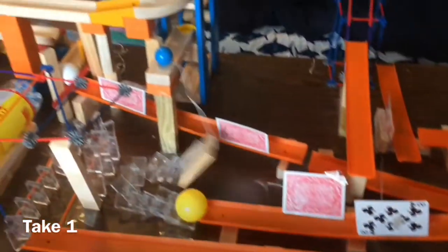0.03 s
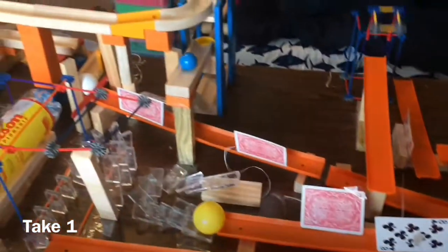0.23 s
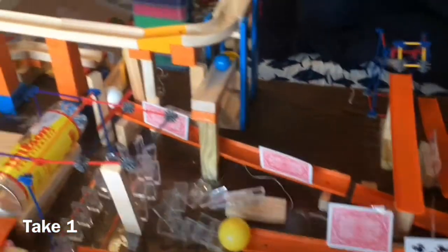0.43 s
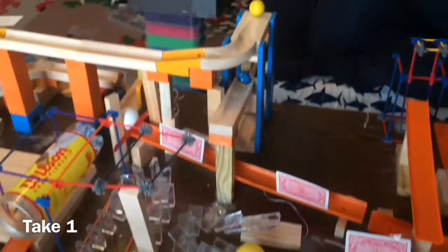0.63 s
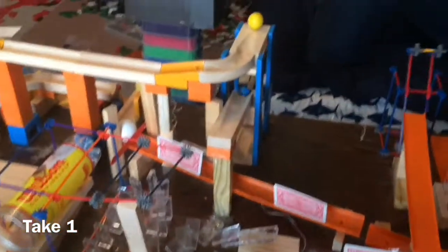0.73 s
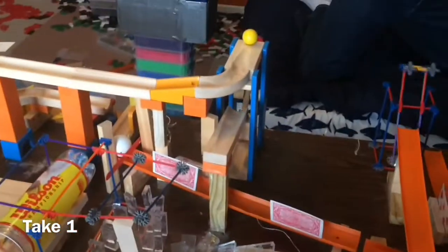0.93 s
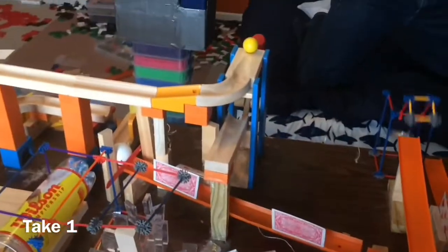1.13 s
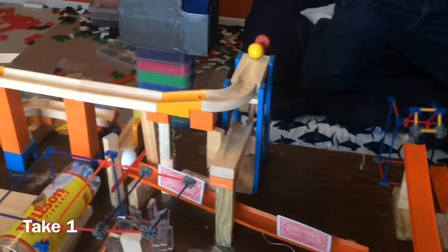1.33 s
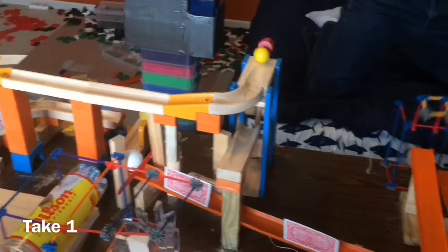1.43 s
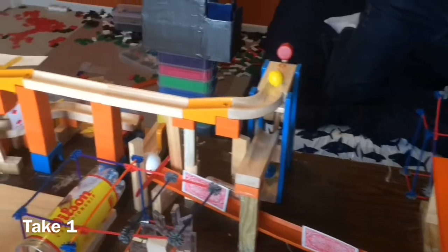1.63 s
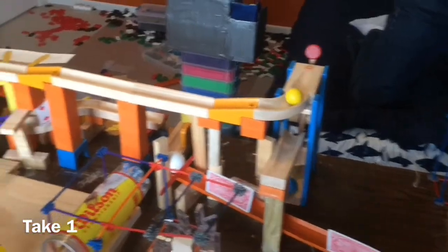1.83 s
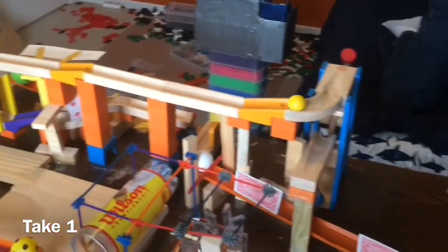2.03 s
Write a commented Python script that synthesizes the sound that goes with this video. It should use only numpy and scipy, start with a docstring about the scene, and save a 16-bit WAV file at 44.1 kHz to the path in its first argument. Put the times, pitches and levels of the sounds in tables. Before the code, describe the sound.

Balls roll and clack through a homemade chain-reaction machine, with one loud wooden slam.

```python
"""A homemade chain-reaction machine on a wooden floor, heard from a metre away in a small room.
A faint metallic ring fades as a ball rumbles along plastic track. At 0.2 s a catch snaps and a wooden
block slams onto plastic. Loose pieces clatter and tinkle, then the ball bumps on the track. At 1.5 s
one ball knocks another, which drops down a wooden ramp and rolls on. Each hit makes a part ring at
its own natural tones (modes); rolling is a stream of tiny bumps that do the same."""
import sys
import numpy as np
from scipy import signal
from scipy.fft import rfft, irfft, next_fast_len
from scipy.io import wavfile
from scipy.ndimage import uniform_filter1d

SR = 44100
rng = np.random.default_rng(int(sys.argv[2]) if len(sys.argv) > 2 else 0)


def to_wav(sig):
    """Store sig (one row per channel, or 1-D mono) as 16-bit WAV at the path in sys.argv[1].

    Samples outside -1..1 are clipped; the rate is SR.
    """
    pcm = np.clip(np.atleast_2d(sig), -1, 1) * 32767
    pcm = np.round(pcm).astype(np.int16)
    wavfile.write(sys.argv[1], SR, pcm.T)  # frames by channels


N = 92610
TIME = np.arange(N) / SR
RING_TIME = np.arange(16384) / SR  # seconds since a hit


def amp(db):
    """Turn decibels into a gain to multiply by."""
    return 10 ** (np.asarray(db) / 20)


def unit(x):
    """Scale a sound so that its energy is 1."""
    return x / np.sqrt(np.sum(x ** 2))


def at_hz(points, hz):
    """Read between the rows of a table, on a scale of octaves."""
    freqs, values = np.array(points, float).T
    return np.interp(np.log(np.maximum(hz, 1)), np.log(freqs), values)


def fade(t60, t=RING_TIME):
    """A dying-away curve that falls 60 dB in t60 seconds."""
    return np.exp(-np.log(1000) * t / t60)


def colour(x, db_of_hz):
    """Turn each frequency up or down by the given dB."""
    n = 2 * next_fast_len(len(x))
    cepstrum = irfft(np.log(amp(db_of_hz(np.arange(n // 2 + 1) * SR / n))))
    cepstrum[1:n // 2] *= 2  # fold onto one side, so nothing sounds ahead of a hit
    cepstrum[n // 2 + 1:] = 0
    return irfft(rfft(x, n) * np.exp(rfft(cepstrum)))[:len(x)]


def tint(x, spectrum):
    """Shape a sound by a table of f/Hz, level/dB, then set its energy to 1."""
    return unit(colour(x, lambda hz: at_hz(spectrum, hz)))


def scatter(t60):
    """A fading burst of tones so crowded that they sound like noise."""
    t = RING_TIME[:int(np.clip(2 * t60 * SR, 256, len(RING_TIME)))]
    burst = rng.standard_normal(len(RING_TIME))[:len(t)] * fade(t60, t)
    for _ in range(2):  # make all frequencies equally strong, then restore the fade
        phase = np.angle(rfft(burst, 2 * next_fast_len(len(t))))
        flat = irfft(np.exp(1j * phase))[:len(t)]
        power = np.abs(uniform_filter1d(flat ** 2, len(t) // 16))
        burst = flat / np.sqrt(power + 1e-18) * fade(t60, t)
    return np.pad(unit(burst), (0, len(RING_TIME) - len(t)))


def ring(modes, t60):
    """A part's strong tones fade away, each slightly detuned by where the part is pressed."""
    tones = 0
    for k, (hz, db) in enumerate(modes):
        pitch = hz * (1 + 0.0079 * rng.standard_normal())
        tones += (-1) ** k * amp(db) * unit(fade(t60) * np.sin(2 * np.pi * pitch * RING_TIME))
    return tones


def crack(spectrum, burst_t60, burst_db):
    """The noisy side of a hit: a short crack plus a burst of crowded tones."""
    return tint(scatter(t60=0.013) + amp(burst_db) * scatter(burst_t60), spectrum)


def struck(hits, modes, spectrum, burst_t60, burst_db, ring_t60, room_db):
    """A part hit several times in the room; harder contact gives more treble."""
    treble_hz = 4870
    sound = np.zeros(N + len(RING_TIME))
    for seconds, db, treble_db in hits:
        blow = unit(crack(spectrum, burst_t60, burst_db) + ring(modes, ring_t60))
        blow = colour(blow, lambda hz: treble_db * hz ** 2 / (hz ** 2 + treble_hz ** 2))
        start = int(seconds * SR)
        sound[start:start + len(blow)] += amp(db) * np.sqrt(SR / 100) * blow  # energy of 10 ms at db
    return in_room(sound[:N], room_db)


def rolling(levels, response, room_db):
    """A rolling ball: many tiny uneven bumps ring the surface under it."""
    bumps_per_s, spread_db = 1200, 3
    bumps = (rng.random(N) < bumps_per_s / SR) * rng.choice([-1, 1], N)
    bumps = bumps * amp(spread_db * rng.standard_normal(N))
    seconds, db = np.array(levels, float).T
    loudness = amp(np.interp(TIME, seconds, db, left=-140, right=-140))
    shaking = unit(bumps) * np.sqrt(N) * loudness
    return in_room(signal.fftconvolve(shaking, unit(response))[:N], room_db)


def block_slam():
    """A wooden block slams onto plastic and bounces."""
    hits = [(.2105, -6, -4.5), (.2235, -15, -4.5), (.2285, -11.5, -7.5), (.238, -11.5, -25),
            (.2432, -16, -5.5), (.2735, -25, 4.5), (.292, -24.5, -7.5), (.5635, -43.5, -25)]  # contacts: t/s, level/dB, treble/dB
    modes = [(135, -22), (172, -21), (1238, -19), (1597, -13), (1711, -14.5), (1874, -14)]  # strong tones: f/Hz, level/dB
    spectrum = [(40, -26.5), (90, -13.5), (140, -5), (600, -11.5), (1100, -2), (2000, -0.5), (3100, -5),
                (4500, -10), (5800, -19), (6400, -26.5), (15000, -33.5)]  # tone of the crack: f/Hz, level/dB
    return struck(hits, modes, spectrum, burst_t60=0.04, burst_db=2.5, ring_t60=0.08, room_db=-4.5)


def ball_on_ramp():
    """A ball drops down a wooden ramp and rolls on; steady bumping keeps the wood ringing."""
    hits = [(1.681, -23.5, -12), (1.6935, -23.5, 1), (1.7055, -22, -4), (1.7595, -27, -12),
            (1.8038, -24, 13), (1.818, -31, 14.5), (1.846, -42, 27), (1.8585, -41.5, 8), (1.876, -31, -29),
            (1.8995, -36.5, 2.5), (1.9605, -30.5, -4.5)]  # bounces: t/s, level/dB, treble/dB
    modes = [(841, -11), (908, -13), (1400, -13), (1513, -5), (1590, -11)]  # strong tones: f/Hz, level/dB
    spectrum = [(50, -17), (200, -2.5), (1600, 0.5), (2800, -7.5), (4000, -9), (5100, -27), (6700, -27),
                (11000, -49)]  # tone of the crack: f/Hz, level/dB
    roll_levels = [(1.69, -34.5), (1.79, -40.5), (1.86, -30.5), (1.95, -33.5), (2.03, -57.5), (2.1, -74)]  # loudness of the roll: t/s, level/dB
    roll_spectrum = [(100, -11.5), (400, 6.5), (900, -2), (1520, 2.5), (1900, 3), (4000, -9.5),
                     (6000, -24.5), (14000, -41.5)]  # tone of the roll: f/Hz, level/dB
    wood = dict(burst_t60=0.03, burst_db=5)
    bounces = struck(hits, modes, spectrum, **wood, ring_t60=0.07, room_db=-3)
    one_bump = crack(roll_spectrum, **wood) + amp(5) * ring(modes, t60=0.09)
    return bounces + rolling(roll_levels, one_bump, room_db=-8.5)


def ball_knock():
    """One ball knocks another with a short, bright click."""
    hits = [(1.4857, -28.5, -2), (1.4915, -23, -13), (1.519, -40, 0.5), (1.547, -45, 3.5)]  # contacts: t/s, level/dB, treble/dB
    modes = [(2130, -3), (2213, -2), (2363, -2), (3596, -7), (9500, -24)]  # strong tones: f/Hz, level/dB
    spectrum = [(100, -18.5), (500, -14), (1300, -16), (2200, -2.5), (2800, -18.5), (3800, -2),
                (5500, -19.5), (15000, -50)]  # tone of the crack: f/Hz, level/dB
    return struck(hits, modes, spectrum, burst_t60=0.03, burst_db=4, ring_t60=0.03, room_db=-5.5)


def thuds():
    """Low, dull hits follow the knock."""
    hits = [(1.4935, -31.5, -16), (1.5165, -25, -11), (1.529, -29, 0), (1.685, -30, 4)]  # contacts: t/s, level/dB, treble/dB
    modes = [(132, -11), (208, -6), (381, -1), (610, -9), (905, -7.5), (1068, -8)]  # tones that die at once: f/Hz, level/dB
    spectrum = [(50, -18.5), (180, -0.5), (480, 1.5), (900, -7), (1400, -14), (2300, -5), (7000, -29),
                (12000, -43)]  # tone of the thud: f/Hz, level/dB
    return struck(hits, modes, spectrum, burst_t60=0.16, burst_db=1, ring_t60=0.001, room_db=-2.5)


def clatter():
    """Loose pieces are hit and ring briefly."""
    hits = [(.6495, -29.5, 2.5), (.676, -30, -14), (.691, -24.5, -5)]  # contacts: t/s, level/dB, treble/dB
    modes = [(176, -9), (378, -12), (890, -13), (1350, -10), (2222, -7), (3675, -4.5)]  # strong tones: f/Hz, level/dB
    spectrum = [(60, -10), (180, -2), (2200, -1), (3000, -8.5), (3900, -1.5), (5500, -20), (15000, -40)]  # tone of the crack: f/Hz, level/dB
    return struck(hits, modes, spectrum, burst_t60=0.05, burst_db=4, ring_t60=0.12, room_db=-1)


def catch_snap():
    """A catch snaps: two quick contacts with almost no ringing."""
    hits = [(.1797, -40, 3.5), (.1815, -25.5, -0.5)]  # contacts: t/s, level/dB, treble/dB
    modes = [(2400, -12), (7200, -16.5)]  # tones that die at once: f/Hz, level/dB
    spectrum = [(900, -27), (1500, -15.5), (2300, 5.5), (4500, -5), (7200, -1.5), (11000, -9),
                (14500, -2.5)]  # tone of the crack: f/Hz, level/dB
    return struck(hits, modes, spectrum, burst_t60=0.001, burst_db=-11, ring_t60=0.001, room_db=-1)


def ball_on_track():
    """A ball bumps and rumbles along plastic track, which hums under it."""
    hits = [(.7535, -30.5, 11), (.767, -43, -22), (.780, -40, -18), (.797, -33, 9.5), (.810, -43.5, -4)]  # knocks: t/s, level/dB, treble/dB
    modes = [(130, -6), (170, -6.5), (254, -7.5), (358, -4), (900, -8.5), (1765, -9), (4900, -34)]  # strong tones: f/Hz, level/dB
    spectrum = [(60, -3), (170, -4.5), (1850, 2.5), (2900, -14), (4200, -8.5), (6000, -36.5), (15000, -55)]  # tone of the crack: f/Hz, level/dB
    roll_levels = [(0, -57.5), (.05, -61), (.1, -92), (.17, -53.5), (.45, -63.5), (.63, -62.5), (.88, -57),
                   (1.03, -83)]  # loudness of the roll: t/s, level/dB
    roll_spectrum = [(70, -22.5), (450, -0.5), (800, -3), (1700, -3.5), (4500, -14), (12000, -38.5)]  # tone of the roll: f/Hz, level/dB
    hum_levels = [(.45, -60), (.57, -47), (.65, -75), (1.2, -88), (1.25, -69), (1.48, -70)]  # loudness of the hum: t/s, level/dB
    hum_modes = [(421, -2.5), (466, -6), (530, -6)]  # tones of the hum: f/Hz, level/dB
    plastic = dict(burst_t60=0.11, burst_db=2)
    knocks = struck(hits, modes, spectrum, **plastic, ring_t60=0.18, room_db=2.3)
    roll = rolling(roll_levels, crack(roll_spectrum, **plastic), room_db=-0.5)
    hum = rolling(hum_levels, ring(hum_modes, t60=0.046), room_db=-2.5)
    return knocks + roll + hum


def tinkle():
    """Light taps make loose pieces ring very high."""
    hits = [(.6635, -45, 0), (.673, -48, 0), (.691, -50, 0), (.8685, -67, 0)]  # taps: t/s, level/dB, treble/dB
    modes = [(8522, -5), (9500, -9)]  # strong tones: f/Hz, level/dB
    spectrum = [(3500, -24), (8700, 5), (10500, 3), (12300, -16), (14500, 3.5)]  # tone of the crack: f/Hz, level/dB
    return struck(hits, modes, spectrum, burst_t60=0.06, burst_db=9, ring_t60=0.07, room_db=-3)


def metal_ring():
    """A thin ring of closely packed tones dies away at the start."""
    centre_hz, width_hz = 5770, 170
    noise = rng.standard_normal(N)
    band = colour(noise, lambda hz: -20 * np.log10(1 + (2 * (hz - centre_hz) / width_hz) ** 2))
    return amp(-49.5) * np.sqrt(N) * unit(band) * fade(t60=0.23, t=TIME)


def in_room(direct, room_db):
    """Add the room's blur of echoes, which builds up quickly and then fades."""
    fade_times = [(120, 0.34), (400, 0.36), (2000, 0.3451), (6000, 0.184), (14000, 0.4)]  # time for echoes to fall 60 dB: f/Hz, t/s
    spectrum = [(3000, 1), (15000, -5.5)]  # tone of the echoes: f/Hz, level/dB
    delay_s, build_s = 0.00039, 0.00097
    noise = rfft(rng.standard_normal(len(RING_TIME)))
    centres_hz = np.geomspace(60, 16000, 9)
    band_position = at_hz(list(zip(centres_hz, range(9))), np.linspace(1, SR / 2, len(noise)))
    echoes = 0
    for k, hz in enumerate(centres_hz):  # each band fades at its own speed
        band = irfft(noise * np.maximum(1 - abs(band_position - k), 0))
        echoes += band * fade(at_hz(fade_times, hz))
    build_up = 1 - np.exp(-np.maximum(RING_TIME - delay_s, 0) / build_s)
    echoes = colour(unit(echoes * build_up), lambda hz: at_hz(spectrum, hz))
    return direct + amp(room_db) * signal.fftconvolve(direct, echoes)[:N]


def background():
    """The room's steady low rumble and faint hiss."""
    rumble_spectrum = [(20, -21.5), (50, -1.5), (90, -5.5), (135, 0.5), (220, -12.5), (500, -21),
                       (2000, -46)]  # tone of the rumble: f/Hz, level/dB
    hiss_spectrum = [(1000, 0.5), (6000, -9)]  # tone of the hiss: f/Hz, level/dB
    rumble = amp(-59.5) * tint(rng.standard_normal(N), rumble_spectrum)
    hiss = amp(-72.5) * tint(rng.standard_normal(N), hiss_spectrum)
    return np.sqrt(N) * (rumble + hiss)


def scene():
    """The parts strike in turn while balls roll, all in one channel."""
    blows = catch_snap() + block_slam() + clatter() + tinkle() + ball_knock() + thuds()
    return (blows + ball_on_track() + ball_on_ramp() + metal_ring() + background())[None]


def record(dry):
    """A limiter turns loud moments down and recovers slowly; peaks and the highest treble are cut."""
    ceiling_db, recovery_s, top_hz = -8, 0.99, 15250
    loudness = np.sqrt(np.abs(uniform_filter1d(dry[0] ** 2, size=132)))  # averaged over 3 ms
    held = np.maximum.accumulate(loudness * np.exp(TIME / recovery_s)) * np.exp(-TIME / recovery_s)
    limited = dry / np.maximum(1, held / amp(ceiling_db))
    low_pass = signal.ellip(8, 0.2, 70, top_hz, fs=SR, output="sos")
    return signal.sosfilt(low_pass, np.clip(limited, -0.88, 0.88))


dry = scene()
out = record(dry)
to_wav(out)
```